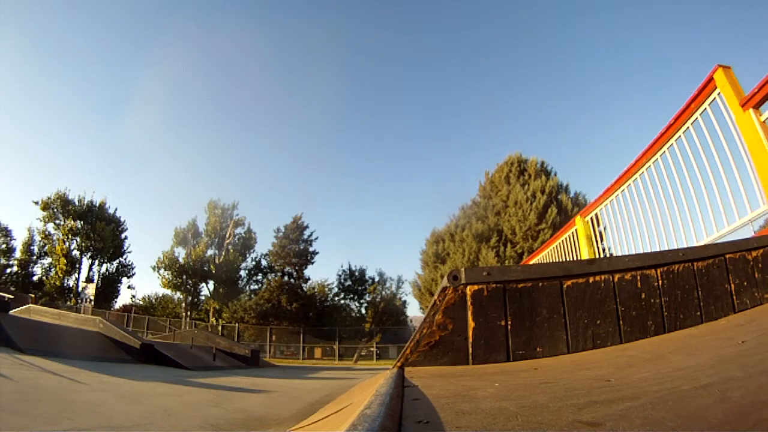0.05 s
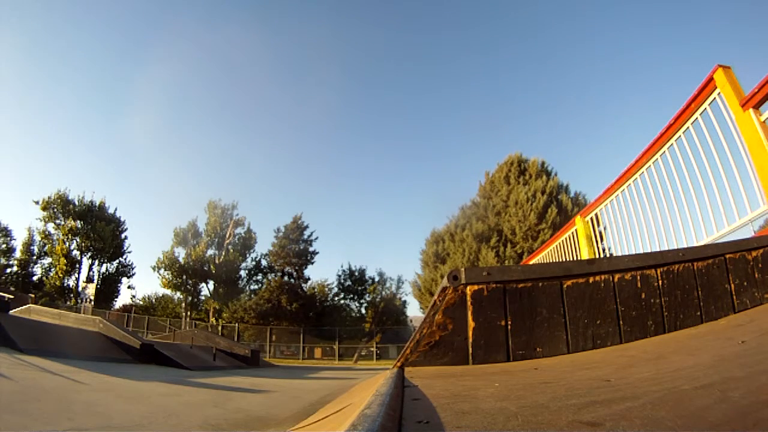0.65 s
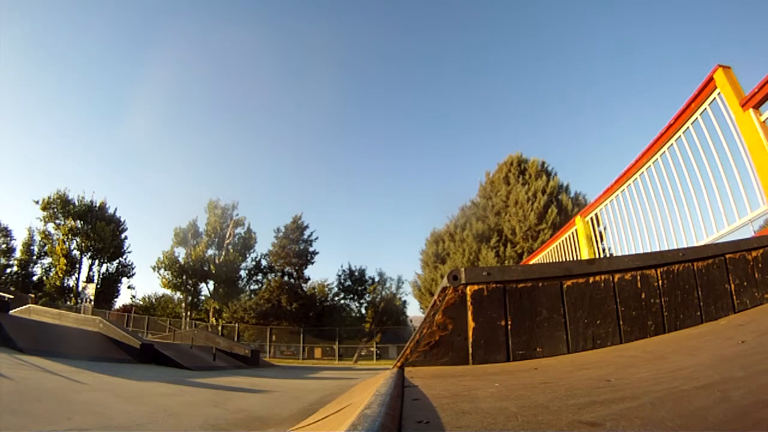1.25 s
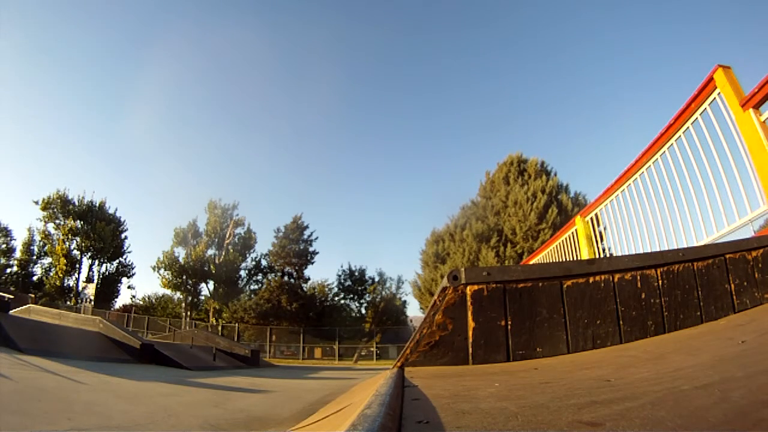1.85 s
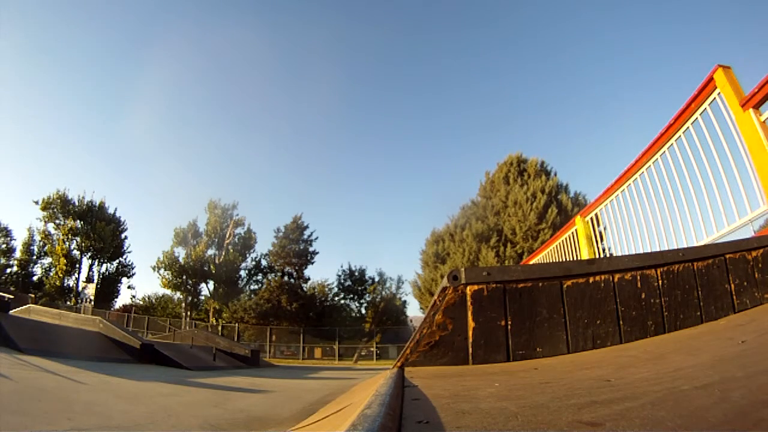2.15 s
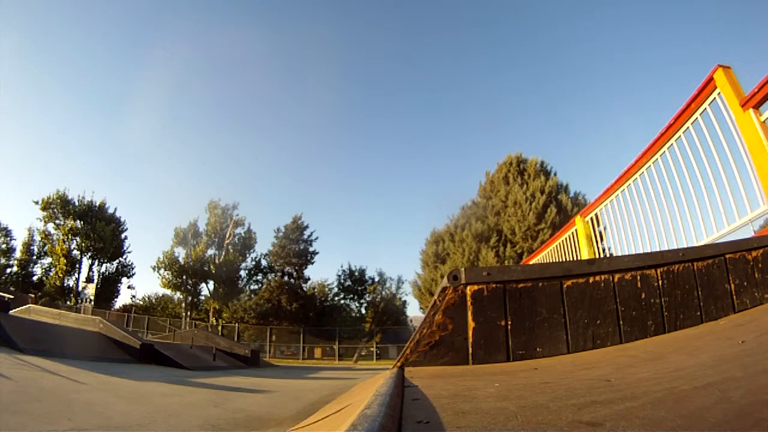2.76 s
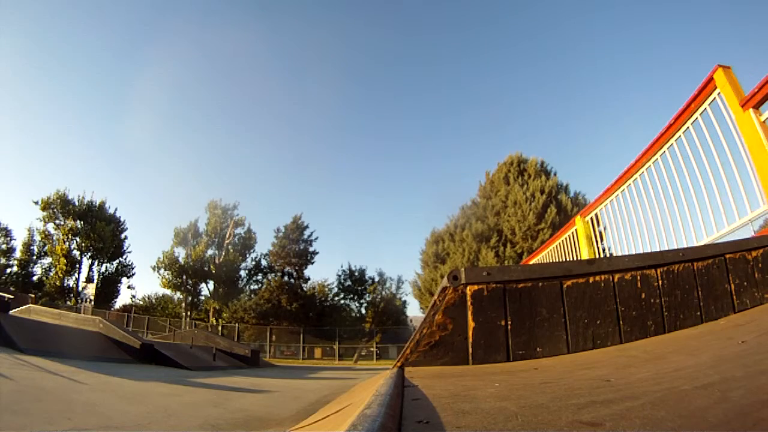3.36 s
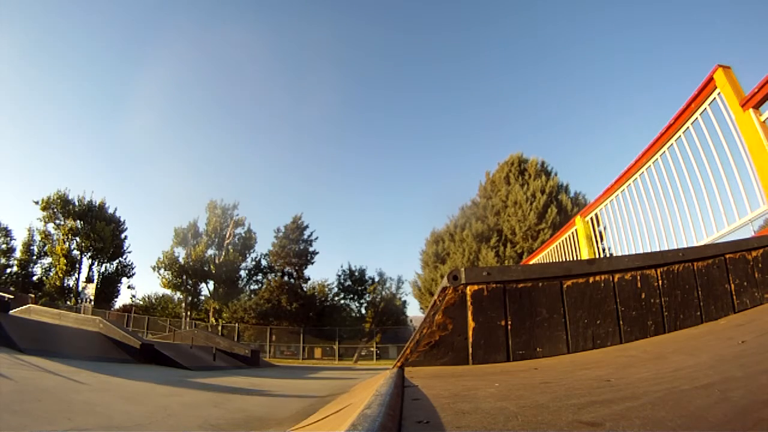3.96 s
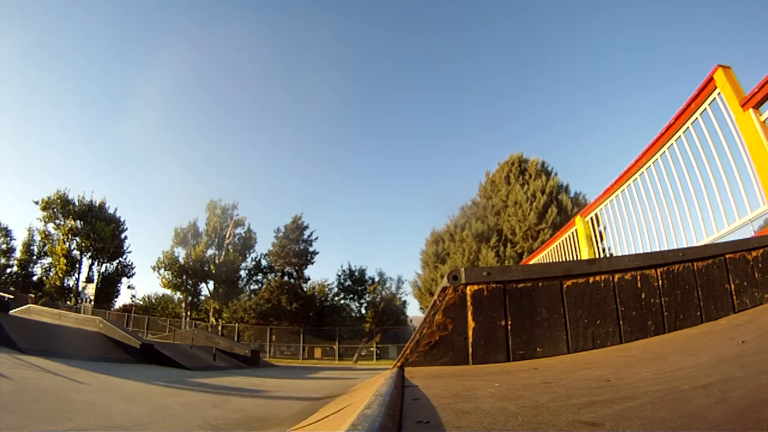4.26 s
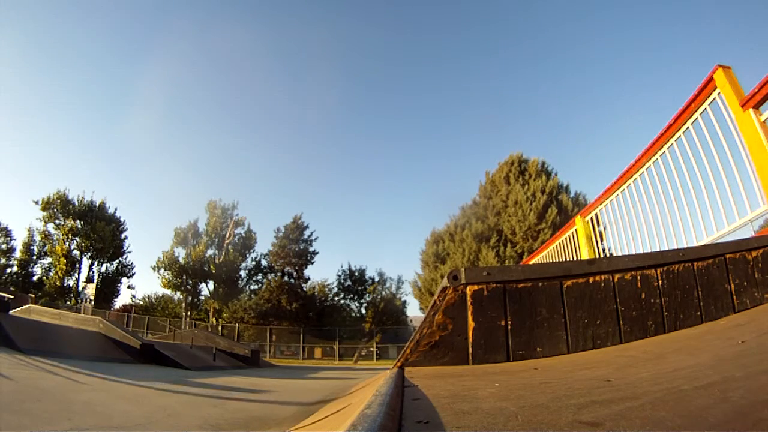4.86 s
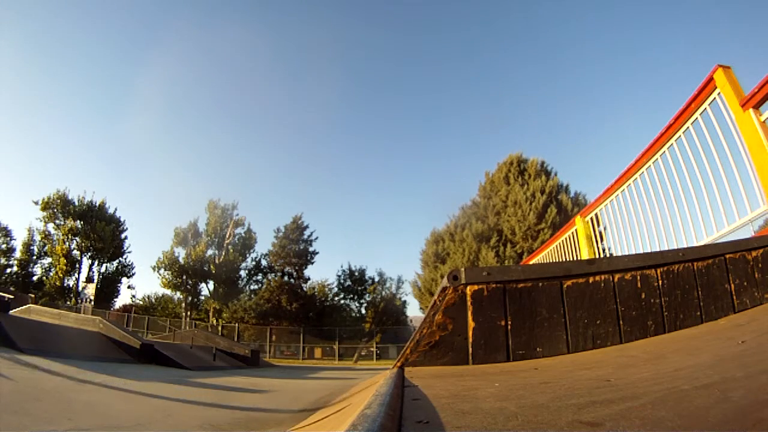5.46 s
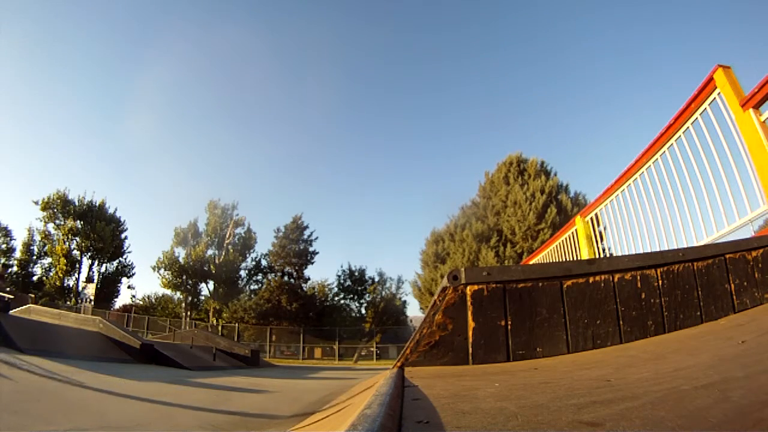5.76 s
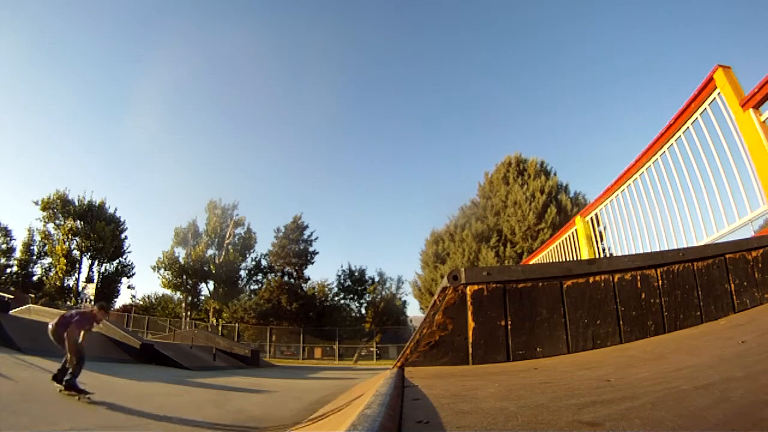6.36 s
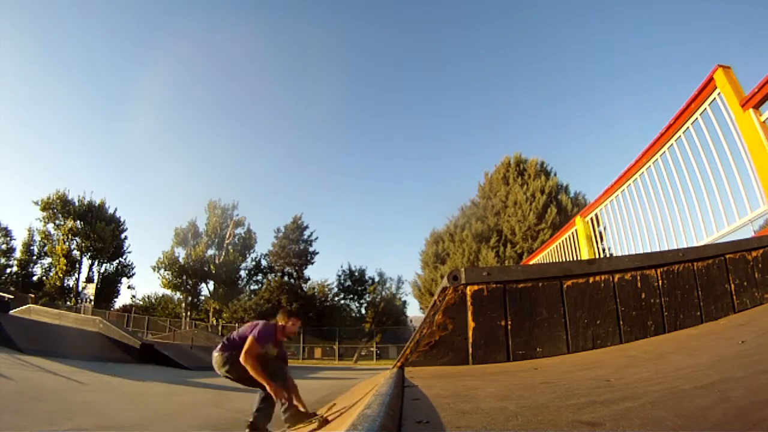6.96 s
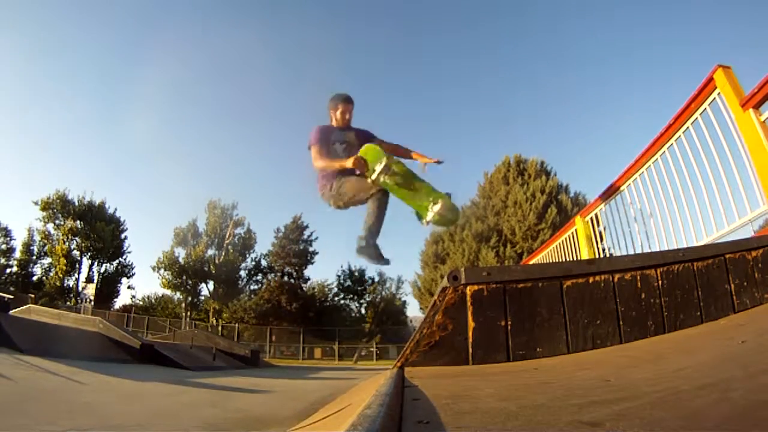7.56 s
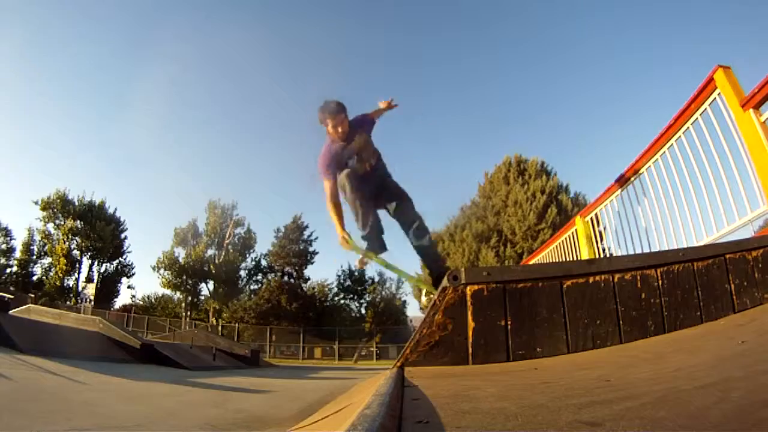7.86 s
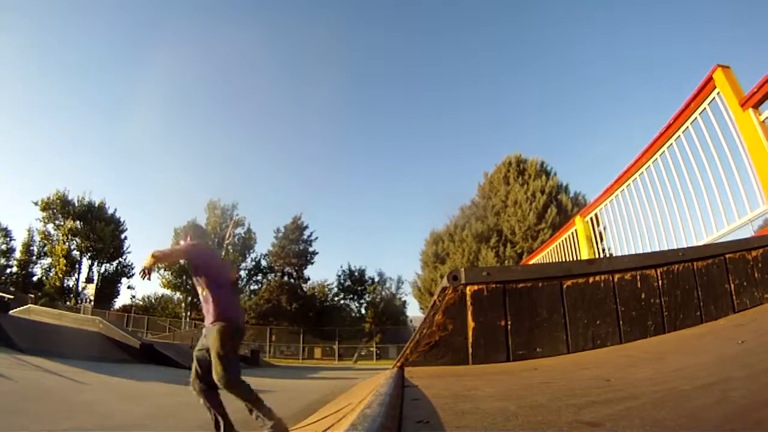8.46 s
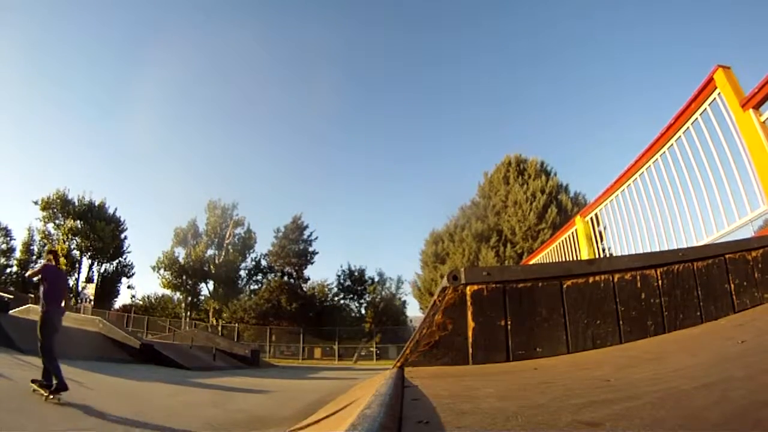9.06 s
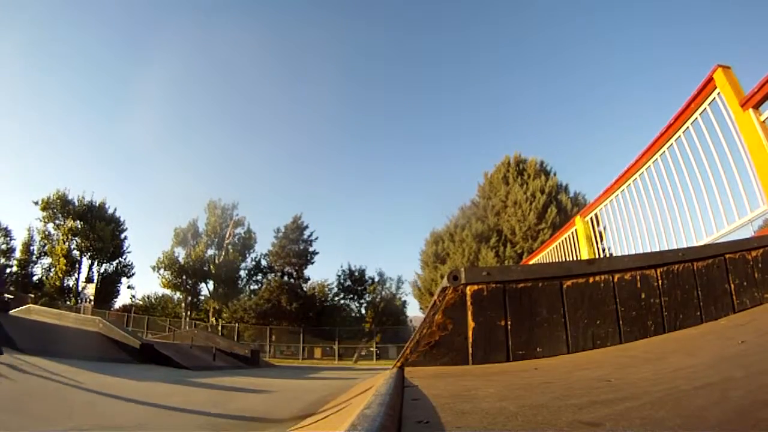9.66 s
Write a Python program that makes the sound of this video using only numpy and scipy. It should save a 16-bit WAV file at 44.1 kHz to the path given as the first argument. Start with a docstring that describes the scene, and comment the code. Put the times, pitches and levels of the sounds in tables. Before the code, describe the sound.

A soft, dull hush of town air hangs over an outdoor skatepark throughout. At about 1.4 seconds a skateboard drops far away with a few faint clacks. It rolls closer, bearings whirring lightly, and from 3.6 to 6 seconds the wheels tick in pairs over concrete joints. At 6.8 seconds it clatters loudly onto a hollow ramp right by the microphone. The ramp booms and rumbles, board and axles knock on its edge, and the microphone's case hops with short knocks. A brief lull comes around 7.5 seconds. Near 7.9 seconds the wheels skid and the board slams down with a sharp slap and deep thump, the loudest moment. More knocks and booms follow, with another clatter off the ramp at 8.5 seconds. The board rolls away with light clacks, fading by about 9.7 seconds. The hits carry a slightly gritty, fizzy treble edge.

```python
"""An outdoor skatepark under a hush of town air, heard from a small camera standing on a hollow ramp.
A skateboard drops far away at 1.4 s, then rolls up with whirring bearings, ticking over concrete joints.
At 6.8 s it clatters over the seam; the ramp booms, the coping knocks and the camera case hops.
The wheels skid, the board slams down near 8 s, recrosses the seam and rolls off.
Throughout, the camera's coarse converter mirrors every sound into the treble."""
import sys
import numpy as np
from scipy import signal
from scipy.fft import rfft, irfft
from scipy.io import wavfile
from scipy.ndimage import uniform_filter1d, map_coordinates

SR = 44100
rng = np.random.default_rng(int(sys.argv[2]) if len(sys.argv) > 2 else 0)


def transcribe(signal):
    """Save signal, clipped to [-1, 1], as a 16-bit WAV file at the path in sys.argv[1]."""
    frames = np.atleast_2d(signal).T
    limited = np.clip(frames, -1, 1)
    pcm = np.round(limited * 32767).astype(np.int16)
    wavfile.write(sys.argv[1], SR, pcm)


N = 427769

# how loudly the board rolls on the ground: (time [s], level [dB])
ROLL_CURVE = [(1.4, -74), (1.7, -69), (2.23, -76), (4.29, -69.5), (4.75, -70.5), (5.03, -67.5),
              (6.28, -66.5), (6.76, -55.5), (7.18, -59), (7.66, -67.5), (7.94, -71), (8.08, -54.5),
              (8.38, -56.5), (8.47, -49), (9.05, -66), (9.7, -71)]
# resonances of the ramp sheet, the deck and the trucks: (centre [Hz], width [Hz], gain [dB])
SHEET_BANDS = [(133.6, 29, 3.5), (315, 78, 5), (417, 92, 2), (594, 190, 0), (843, 274, -7)]
DECK_BANDS = [(680, 197, 3.8), (1033, 184, 6.8), (1308, 190, 3.8), (1617, 250, 0.5), (2185, 203, 6.4),
              (2324, 150, 1)]
TRUCK_BANDS = [(2810, 170, 2), (3510, 310, 2.5), (4630, 770, -10)]


def from_db(db):
    """Decibels to gain."""
    return 10 ** (np.asarray(db) / 20)


def rms_one(x):
    """Scale to unit power."""
    return x / np.sqrt(np.mean(x ** 2) + 1e-20)


def automation(rows):
    """Each column of a breakpoint curve at every sample."""
    times, *columns = np.transpose(rows)
    return [np.interp(np.arange(N) / SR, times, column) for column in columns]


def gate(rows, fade_s=0.11):
    """Open while a curve lasts, fading at both ends."""
    start, end = rows[0][0], rows[-1][0]
    return np.interp(np.arange(N) / SR, [start - fade_s, start, end, end + fade_s], [0, 1, 1, 0])


def add(out, s, sound):
    """Mix a sound in at s seconds."""
    at = round(s * SR)
    out[at:at + len(sound)] += sound[:N - at]


def drift(rate_hz):
    """A random wander with a spread of about 1."""
    knots = rng.standard_normal(N // 20)
    return map_coordinates(knots, [np.arange(N) / SR * rate_hz], order=1, mode="wrap") * np.sqrt(3 / 2)


def grit(size, spread_db):
    """Countless tiny contacts of uneven strength."""
    return rms_one(rng.standard_normal(size) * from_db(spread_db * np.clip(rng.standard_normal(size), -3, 3)))


def resonate(x, bands):
    """Parallel damped resonances with steep skirts."""
    out = 0
    for hz, width, db in bands:
        band = signal.butter(2, [max(hz - width / 2, 15), hz + width / 2], "band", fs=SR, output="sos")
        out += from_db(db) * signal.sosfilt(band, x + 1e-18)
    return out


def swells(loads):
    """Envelope of a heavy body: each load swells and dies away, and their energies add."""
    t, power = np.arange(N) / SR, np.zeros(N)
    for s, db, swell_s, t60 in loads:
        rise = np.sin(np.pi / 2 * np.minimum(t / swell_s, 1)) ** 2
        decay = from_db(-60 * np.maximum(t - swell_s, 0) / t60)
        add(power, s, (from_db(db) * rise * decay) ** 2)
    return np.sqrt(power)


def struck(hits, modes, contact_s):
    """Each soft contact sets all the modes of a body ringing."""
    t, out = np.arange(SR // 4) / SR, np.zeros(N)
    ring = sum(from_db(db - 60 * t / t60) * np.sin(2 * np.pi * hz * t) for hz, db, t60 in modes)
    for s, db in hits:
        add(out, s, from_db(db) * ring * (1 - np.exp(-t / contact_s)))
    return out


def rattles(contacts, bodies, rise_s, spread_db, build_s=0.00197):
    """Each contact is a dying burst of tiny impacts that rings several bodies, each at its own level."""
    t, out = np.arange(SR // 5) / SR, np.zeros(N)
    for s, rattle_s, *levels in contacts:
        force = grit(len(t), spread_db) * np.exp(-t / rattle_s) * (1 - np.exp(-t / rise_s))
        for body, db in zip(bodies, levels):
            sound = resonate(force, body)
            crest = np.sqrt(2 * uniform_filter1d(sound ** 2, size=100).max())
            add(out, s - build_s, from_db(db) * sound / crest)  # early, as the ring takes time to build
    return out


def town_air(level_db=-59):
    """The bed: a steady, dull hush from far off."""
    # tone of the hush: (frequency [Hz], spectral density [dB])
    spectrum = [(14, -37), (24, 0.5), (117, -3.5), (150, -6.5), (172, -8), (237, -8.5), (535, -14),
                (769, -17), (1320, -21.5), (2440, -23.5), (5400, -28.5), (7020, -21), (11900, -120)]
    hz, db = np.transpose(spectrum)
    bins_hz = np.maximum(np.arange(N // 2 + 1) * SR / N, 1)
    colour = from_db(np.interp(np.log(bins_hz), np.log(hz), db))
    return from_db(level_db) * rms_one(irfft(rfft(rng.standard_normal(N)) * colour, N))


def park_reverb(x, t60=0.4, wet_db=-18, rise_s=0.0073):
    """Ramps and fences scatter a thin tail."""
    t = np.arange(SR * 3 // 4) / SR
    tail = rng.standard_normal(len(t)) * from_db(-60 * t / t60) * (1 - np.exp(-t / rise_s))
    return x + from_db(wet_db) * signal.fftconvolve(x, tail / np.linalg.norm(tail))[:N]


def ground_drone(drone_db=-60, mid_roll_db=-64, follow=0.93):
    """The concrete carries the low end of the rolling board."""
    # resonances of the ground: (centre [Hz], width [Hz], gain [dB])
    ground_bands = [(87.5, 38, 1), (124.8, 66, -1.2)]
    roll_db, = automation(ROLL_CURVE)
    envelope = from_db(drone_db + follow * (roll_db - mid_roll_db)) * gate(ROLL_CURVE)
    return envelope * rms_one(resonate(rng.standard_normal(N), ground_bands))


def bearings(width_hz=320, flutter_db=2.0):
    """The balls rattle in a narrow band whose pitch follows the speed of the wheels."""
    # whirr of the spinning wheels: (time [s], pitch [Hz], level [dB])
    spin = [(1.55, 2224, -71), (2.3, 2214, -89), (3.1, 2200, -86), (3.4, 2200, -69), (4.4, 2000, -82),
            (4.9, 1950, -65), (5.5, 2090, -57), (6.15, 2164, -55), (6.4, 2141, -68), (6.75, 2170, -52.5),
            (7.05, 2210, -63), (7.4, 2270, -58.5), (7.9, 2393, -64), (8.35, 2198, -66), (8.7, 2118, -49),
            (9.1, 2097, -69), (9.35, 2087, -62), (9.7, 2076, -64)]
    whirr_hz, level_db = automation(spin)
    lowpass = signal.butter(3, width_hz / 2, fs=SR, output="sos")
    rattle = signal.sosfilt(lowpass, rng.standard_normal((2, N)))
    phase = 2 * np.pi * np.cumsum(whirr_hz) / SR
    whirr = rms_one(rattle[0] * np.cos(phase) + rattle[1] * np.sin(phase))
    return from_db(level_db + flutter_db * drift(30)) * gate(spin) * whirr


def wheels(boost_db=5.5):
    """Grainy concrete keeps the wheels ringing; their treads hiss in the turns."""
    # resonances of wheel and tread: (centre [Hz], width [Hz], gain [dB])
    wheel_bands = [(585, 152, -2.5), (1013, 53, -7), (1293, 72, -3), (1454, 270, -1.5), (1874, 61, -4),
                   (2178, 163, 1), (2490, 56, -1.5), (2930, 91, -7), (3900, 250, -21), (4730, 1400, -20)]
    tread_bands = [(3110, 390, 0)]
    # the treads scrub as the board carves: (time [s], level [dB], swell [s], t60 [s])
    scrubs = [(5.05, -64.5, 0.24, 2.3), (6.0, -64, 0.29, 3.3), (6.45, -62, 0.39, 2.5), (8.4, -64, .3, 4.45)]
    roll_db, = automation(ROLL_CURVE)
    road = grit(N, spread_db=6.5) * from_db(1.35 * drift(45))
    ring = from_db(roll_db + boost_db) * gate(ROLL_CURVE, fade_s=.03) * rms_one(resonate(road, wheel_bands))
    return ring + swells(scrubs) * rms_one(resonate(road, tread_bands))


def far_clatter(clack_rattle_s=0.0059):
    """Axles tick in pairs over the joints; board and shoes clack on the concrete."""
    # both axles cross a joint: (time [s], rear lag [s], rear gain [dB], rattle [s],
    # thud [dB], clack [dB], ring [dB], snap [dB])
    joints = [(3.686, 0.078, -7.5, 0.013, -55, -42, -43, -48),
              (4.354, 0.12, 0.5, 0.0048, -64, -46.5, -40, -72),
              (5.013, .102, 1.5, 0.0077, -62, -45, -59, -71), (5.373, .073, 0, 0.021, -44.5, -39, -52, -42),
              (6.056, 0.089, 2, 0.013, -46.5, -44, -49.5, -60)]
    # board and shoe hits: (time [s], level [dB], brightness [dB])
    clacks = [(1.44, -43, 1.5), (1.63, -48.5, 0.5), (1.688, -47.5, 1), (1.748, -51.5, -3), (3.623, -54, 9),
              (4.164, -51.5, 6.5), (5.52, -41.5, -2), (8.785, -45, -7.5), (8.905, -44, -4),
              (9.425, -51, -3), (9.525, -50, 1.5)]
    # the four layers of a distant hit: (centre [Hz], width [Hz], gain [dB])
    thud = [(128, 64, 0), (289, 240, -8.5), (674, 195, -5), (990, 370, -8.5)]
    clack = [(1470, 215, -2.5), (1786, 960, -5), (2193, 110, 4)]
    ring = [(2775, 340, 21), (3210, 210, -26.5)]
    snap = [(3950, 230, -1.2), (4840, 750, 0.5)]
    contacts = []
    for s, lag_s, rear_db, rattle_s, *levels in joints:
        contacts += [(s, rattle_s, *levels), (s + lag_s, rattle_s, *np.add(levels, rear_db))]
    for s, db, bright in clacks:  # brighter means less thud, more ring and snap
        contacts.append((s, clack_rattle_s, db - 3.5 - bright, db, db - 8.5 + bright, db - 12.5 + bright))
    return rattles(contacts, [thud, clack, ring, snap], rise_s=0.00077, spread_db=5.0, build_s=0.000963)


def ramp_rumble():
    """On the ramp, the grain under the wheels shakes the sheet."""
    # the ride up and back down: (time [s], level [dB])
    rumble = [(6.8, -62), (6.88, -42), (7.0, -35.5), (7.2, -42), (7.5, -61.5), (7.9, -72), (8.04, -54.5),
              (8.25, -55), (8.5, -39), (8.66, -54.5), (9.1, -67)]
    level_db, = automation(rumble)
    road = grit(N, spread_db=2.5) * from_db(drift(56))
    return from_db(level_db) * gate(rumble) * rms_one(resonate(road, SHEET_BANDS))


def ramp_boom(frame_hz=29.6, throb=0.19, roughness=0.31, after_db=-25, after_t60=2.28):
    """The panel booms at a pitch that shifts with each load, throbbing with the sway of the frame."""
    # loads on the panel: (time [s], level [dB], swell [s], t60 [s], pitch [Hz])
    booms = [(6.55, -51, .22, .12, 113), (6.835, -32, 0.034, .3, 90), (6.875, -14, .085, 0.51, 88.4),
             (7.12, -26, 0.028, 0.57, 85.8), (7.22, -24, .03, 0.6, 91.4), (7.285, -20, 0.027, 0.37, 83),
             (7.39, -27.5, 0.024, 0.61, 86.6), (7.9, -19, 0.042, .5, 80.2), (7.99, -17.5, 0.052, 0.4, 77.2),
             (8.276, -15, 0.026, 0.22, 83.2), (8.38, -18, .055, 0.064, 82.6), (8.5, -18, .035, .6, 82.3),
             (8.57, -19.5, 0.032, 0.57, 86.2)]
    # the rider's weight rocks the frame: (time [s], level [dB], swell [s], t60 [s])
    sways = [(4, -63, 2.3, 4), (6.8, -30.5, 0.29, 2.8), (7.26, -28.5, .06, 1.22), (7.93, -28.5, .06, 2.2),
             (8.23, -28, .08, 1.2), (8.78, -42.5, .12, 7)]
    panel_hz, = automation([(s + swell_s, hz) for s, _, swell_s, _, hz in booms])
    panel = np.sqrt(2) * np.sin(2 * np.pi * np.cumsum(panel_hz) / SR)
    shudder = roughness * rms_one(resonate(rng.standard_normal(N), [(83.3, 35.7, 0)]))
    frame = np.sqrt(2) * np.sin(2 * np.pi * np.cumsum(frame_hz + 1.7 * drift(15)) / SR)
    loads = [row[:4] for row in booms]
    after_ring = [(s, db + after_db, swell_s, after_t60) for s, db, swell_s, _ in loads]
    return swells(loads + after_ring) * (panel * (1 + throb * frame) + shudder) + swells(sways) * frame


def case_knocks():
    """The camera case hops and rings briefly as it drops back on the ramp."""
    # landings of the case: (time [s], level [dB])
    knocks = [(6.948, -26), (7.274, -22.5), (7.318, -22.5), (7.977, -15), (8.119, -35.5), (8.222, -41.5),
              (8.332, -23), (8.370, -29), (8.444, -19), (8.553, -20), (8.674, -30.5)]
    # modes of the case: (pitch [Hz], gain [dB], t60 [s])
    case_modes = [(694.6, 4.5, 0.072), (664, -8, 0.019), (1230, -7.5, 0.024)]
    return struck(knocks, case_modes, contact_s=0.002)


def seam_clatter():
    """Two front wheels, two rear wheels, then the plate falling back: one pattern, up and down."""
    # passes over the seam at the ramp's foot: (time [s], level [dB], extra thud [dB])
    crossings = [(6.834, 1, 0.5), (8.509, -2, -0.5)]
    # hits within a pass: (delay [s], rattle [s], thud [dB], clack [dB], edge [dB])
    pattern = [(0, .004, -28, -29, -26.5), (.006, .008, -23, -23.5, -22), (.06, 0.0046, -27, -23, -35.5),
               (.068, .011, -18.5, -21.5, -20), (.128, 0.015, -24, -28.5, -37)]
    # resonances of the seam plate and its edge: (centre [Hz], width [Hz], gain [dB])
    plate = [(314.5, 39.5, -4), (390, 74, -2.5), (472, 110, -4.5), (575, 119, -4)]
    edge = [(3360, 1720, -7), (3970, 460, -12), (4900, 565, 4.5), (5200, 200, -15)]
    contacts = [(s + delay_s, rattle_s, *np.add(levels, [db + thud_db, db, db]))
                for s, db, thud_db in crossings for delay_s, rattle_s, *levels in pattern]
    return rattles(contacts, [plate, DECK_BANDS, edge], rise_s=0.0028, spread_db=5.0, build_s=0.002)


def coping_skid(start_s=7.897, length_s=.056, count=6, jitter_s=.002, weight_db=6, truck_db=-8.5):
    """The wheels catch and slip down the coping in a quick run that grows towards the landing."""
    progress = np.linspace(0, 1, count)
    times = start_s + length_s * progress + jitter_s * rng.uniform(-1, 1, count)
    levels_db = -28 + 1.5 * progress
    contacts = [(s, 0.013, db + weight_db, db, db + truck_db) for s, db in zip(times, levels_db)]
    return rattles(contacts, [SHEET_BANDS, DECK_BANDS, TRUCK_BANDS], rise_s=0.002, spread_db=5.5)


def ramp_blows(truck_db=-16.5, dulling=0.43):
    """A heavy blow shakes the sheet; a light one leaves the trucks ringing."""
    # board, trucks and feet hit ramp and coping: (time [s], rattle [s], level [dB], weight [dB])
    blows = [(6.951, .012, -28, 4.5), (7.034, 0.0057, -32, -2), (7.069, .007, -37.5, 11),
             (7.213, .01, -31, -13), (7.241, 0.0093, -31, -7), (7.274, .004, -24, -18),
             (7.293, 0.0055, -31.5, -6), (7.31, 0.0065, -28.5, 2), (7.327, 0.0022, -30, 5),
             (7.379, .011, -33.5, -4), (7.452, .011, -43.5, -2), (7.891, .007, -43.5, 18.5),
             (7.969, .002, -17, 2), (8.038, .008, -35.5, -4), (8.057, 0.0026, -27.5, -18),
             (8.086, .011, -34, -18), (8.141, 0.0066, -32.5, -16), (8.22, .005, -37.5, -8),
             (8.282, 0.0059, -19.5, -12), (8.303, .023, -24.5, 0), (8.332, 0.0055, -23, -14),
             (8.371, .003, -31, -6), (8.444, 0.0026, -34, -3)]
    contacts = [(s, rattle_s, db + weight, db, db + truck_db - dulling * weight)
                for s, rattle_s, db, weight in blows]
    bodies = [SHEET_BANDS, DECK_BANDS, TRUCK_BANDS]
    return rattles(contacts, bodies, rise_s=0.00019, spread_db=6.0, build_s=0.002008)


def rider_thumps():
    """The rider's weight lands on the panel and rings its low modes."""
    # landings of the rider: (time [s], level [dB])
    thumps = [(7.305, -17), (7.959, -12)]
    # modes of the panel: (pitch [Hz], gain [dB], t60 [s])
    panel_modes = [(45.7, 0, 0.092), (104, -9, .05), (143, -11, .09)]
    return struck(thumps, panel_modes, contact_s=0.0031)


def deck_slaps():
    """Each slap is one clean impact on the broad, heavily damped face of the deck."""
    # the deck hits the ramp: (time [s], peak level [dB])
    slaps = [(7.068, -32.5), (7.2739, -22), (7.309, -18), (7.9678, -3), (8.056, -21.5)]
    # resonances of the face: (centre [Hz], width [Hz], gain [dB])
    face_bands = [(1229, 480, 0), (2040, 290, -3.5)]
    crack = resonate(signal.unit_impulse(SR // 20), face_bands)
    out = np.zeros(N)
    for s, db in slaps:
        add(out, s, from_db(db) * crack / np.abs(crack).max())
    return out


def scene():
    """The mono mix: the board's hits ring out into the park; everything else stays dry."""
    hits = far_clatter() + seam_clatter() + ramp_blows() + coping_skid() + deck_slaps()
    shaken = case_knocks() + rider_thumps()
    rolling = wheels() + bearings() + ground_drone() + ramp_rumble()
    return (park_reverb(hits) + shaken + rolling + ramp_boom() + town_air())[None]


def record(dry, band_edge_hz=5350, rate_hz=12000, cutoff_hz=15500):
    """A slow converter holds each sample, mirroring its narrow band around its rate; the top is cut."""
    narrow = signal.sosfilt(signal.butter(14, band_edge_hz, fs=SR, output="sos"), dry)
    mirrored = narrow * (1 + 2 * np.cos(2 * np.pi * rate_hz * np.arange(N) / SR))
    hold_droop = np.sinc(np.arange(N // 2 + 1) * SR / N / rate_hz)
    held = irfft(rfft(mirrored) * hold_droop, N)
    return signal.sosfilt(signal.ellip(10, .1, 80, cutoff_hz, fs=SR, output="sos"), held)


dry = scene()
out = record(dry)
transcribe(out)
```